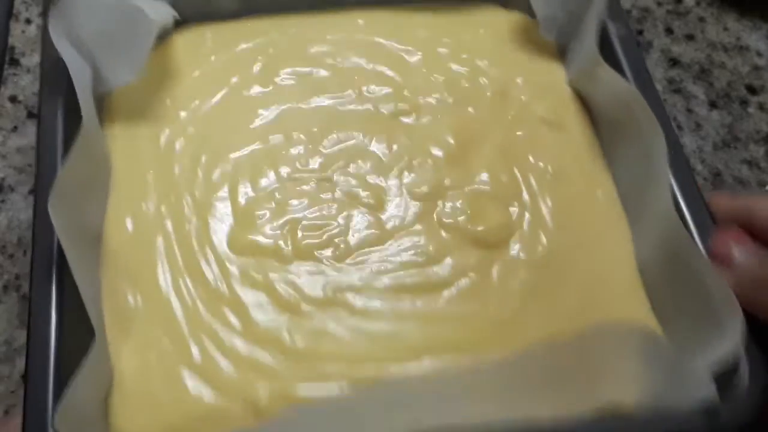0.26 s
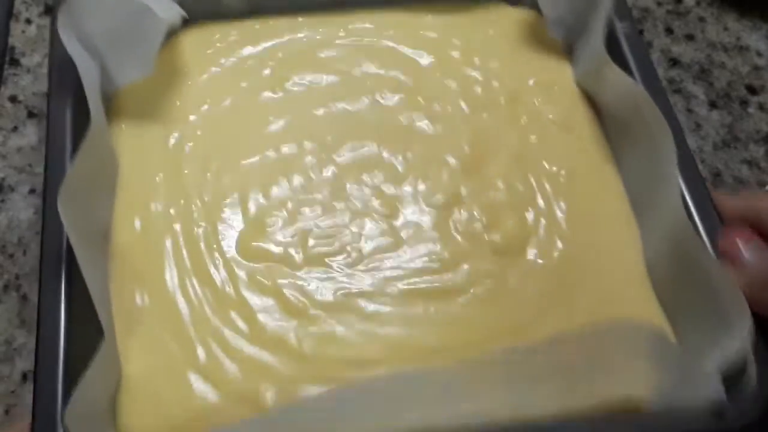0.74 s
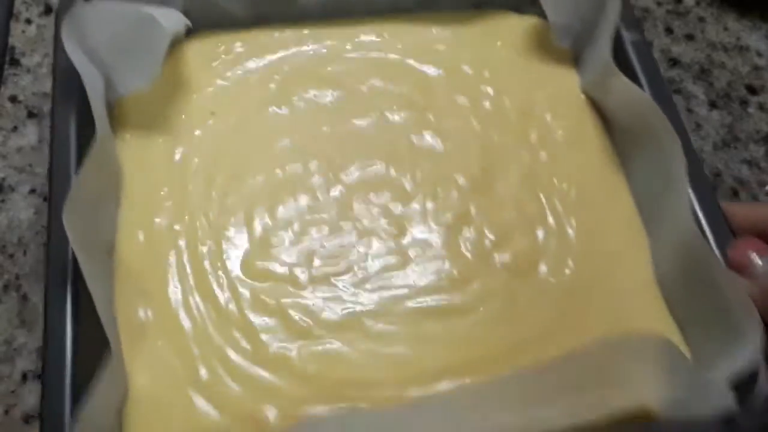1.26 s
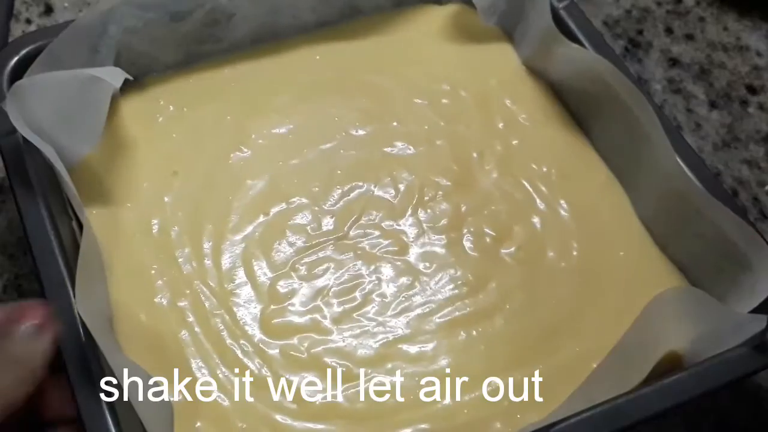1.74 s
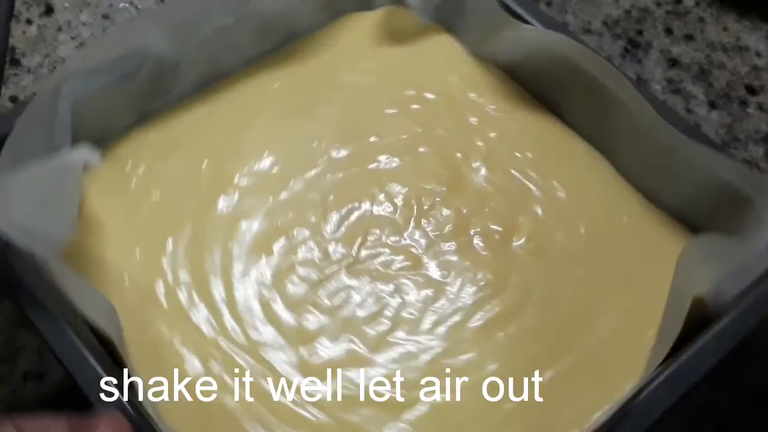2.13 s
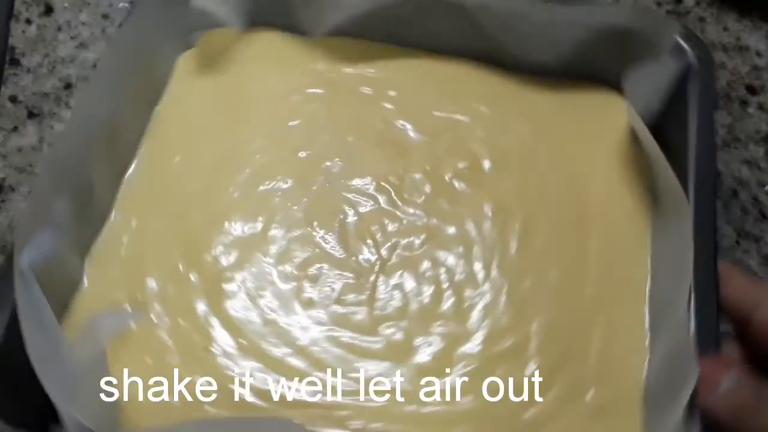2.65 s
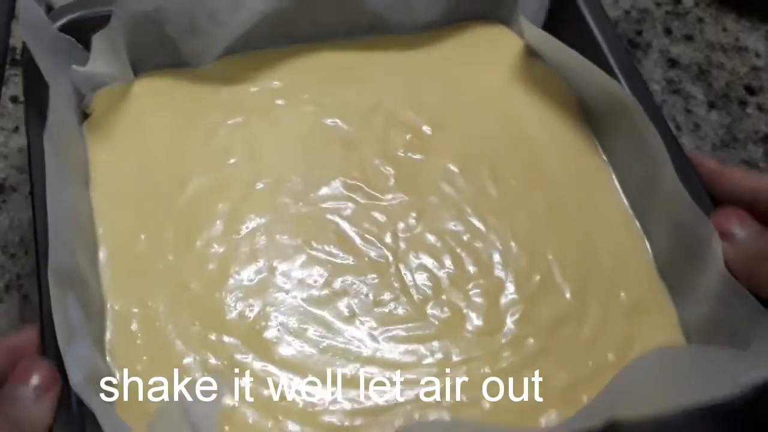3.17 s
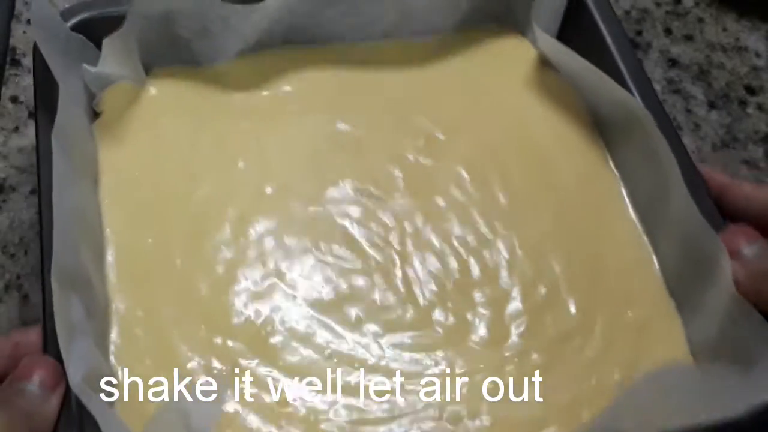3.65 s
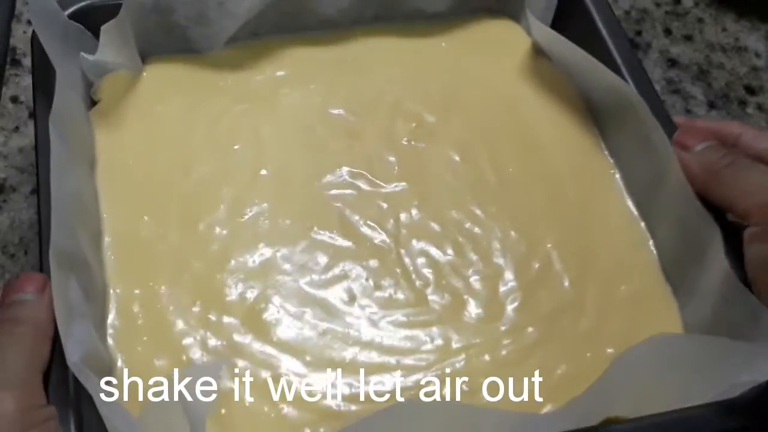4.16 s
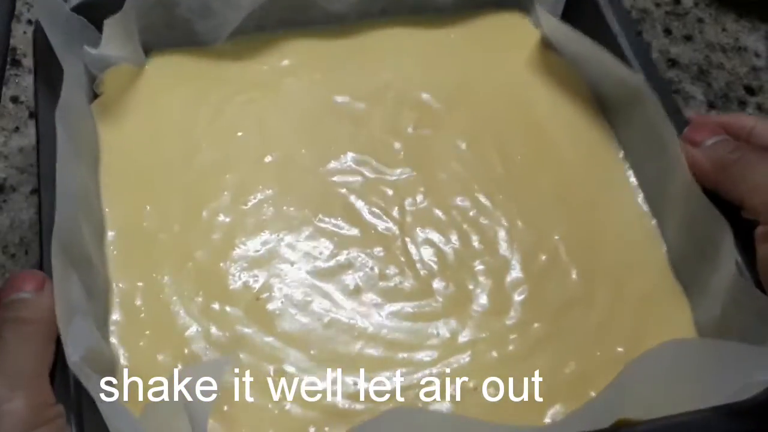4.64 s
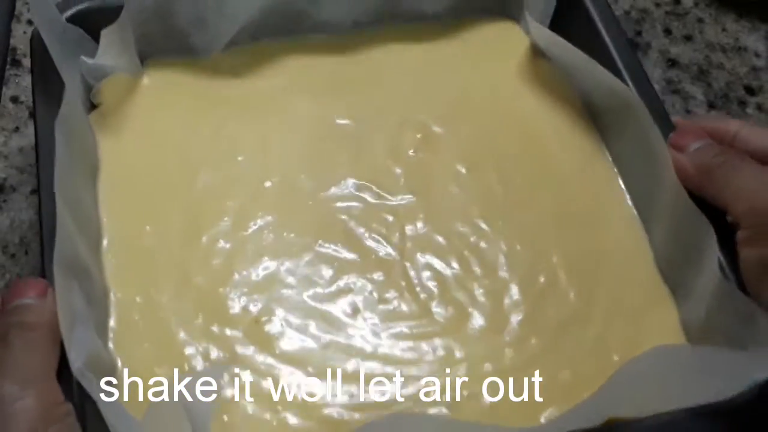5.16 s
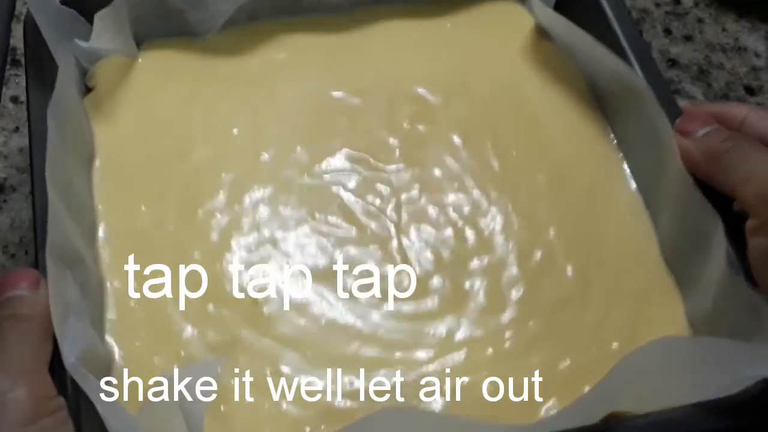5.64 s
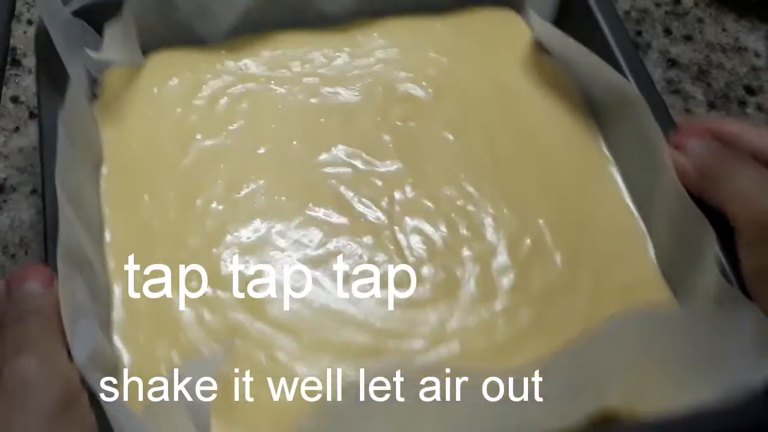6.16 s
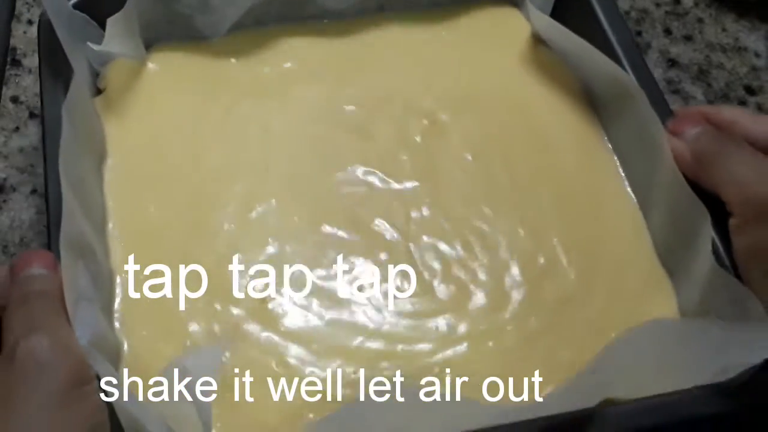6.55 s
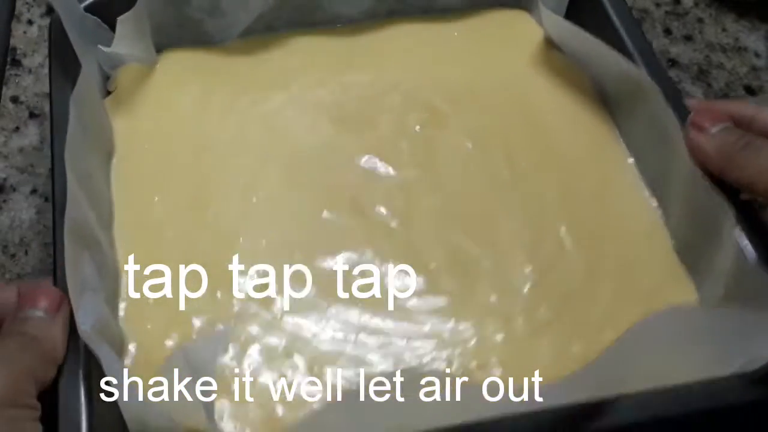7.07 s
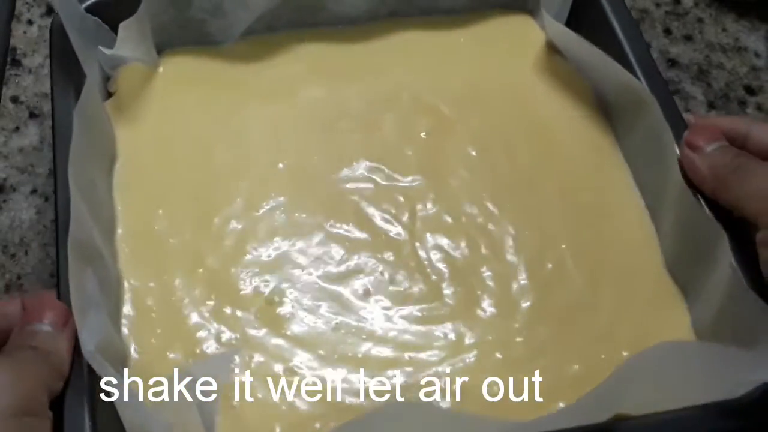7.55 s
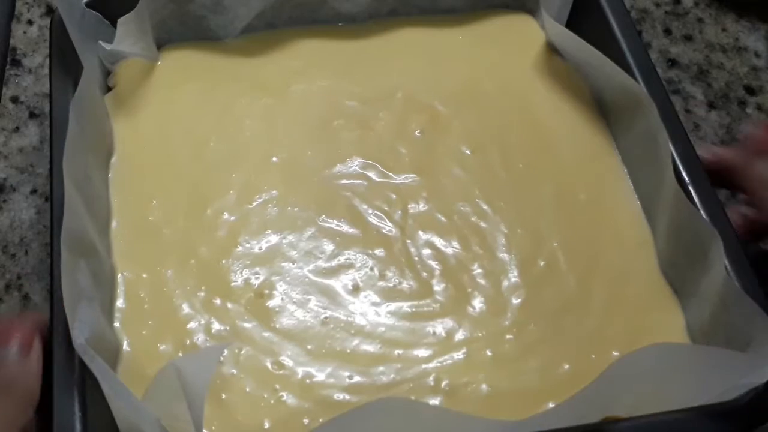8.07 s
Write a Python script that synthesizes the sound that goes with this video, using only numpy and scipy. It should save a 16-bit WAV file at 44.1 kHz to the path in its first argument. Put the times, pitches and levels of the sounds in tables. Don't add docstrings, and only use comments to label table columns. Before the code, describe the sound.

A quiet kitchen with a soft fridge hum. Hands shuffle a paper-lined tin full of batter: dry crackles, snaps and faint low bumps. A light metallic touch on the counter, more crinkling as it is turned, then five loud, dull metal bangs about a third of a second apart. After brief rustling come three more raps. A close small microphone catches short room echoes.

```python
import sys
import numpy as np
from scipy import signal
from scipy.fft import rfft, irfft
from scipy.io import wavfile
from scipy.ndimage import uniform_filter1d

SR = 44100
rng = np.random.default_rng(int(sys.argv[2]) if len(sys.argv) > 2 else 0)


def unload_wav(signal):
    wavfile.write(
        sys.argv[1],
        SR,
        np.round(np.clip(np.atleast_2d(signal).T, -1, 1) * 32767).astype(np.int16),
    )


def volts_from_db(level):
    exponent = np.asarray(level, float) / 20
    return 10 ** exponent


N = 366471

# frequency in Hz, level in dB per Hz.
PAPER_SPECTRUM = [(470, -31), (800, 4.5), (1250, -4), (2100, -3.5), (3100, -5), (4300, -6.5), (6500, -4),
                  (8020, -14.5), (9000, -5), (10500, -6.5), (12500, -12), (15300, -14), (16500, -34)]


def evened(x):
    return x / np.sqrt(np.mean(x ** 2) + 1e-20)


def read(points, hz):
    f, value = np.transpose(points)
    return np.interp(np.log(hz + 1), np.log(f + 1), value)


def coloured(x, spectrum):
    gain = volts_from_db(read(spectrum, np.fft.rfftfreq(x.shape[-1], 1 / SR)))
    return irfft(rfft(x) * gain, x.shape[-1])


def band(x, lo_hz, hi_hz):
    return signal.sosfilt(signal.butter(2, [lo_hz, hi_hz], "bandpass", fs=SR, output="sos"), x)


def add(mix, s, sound):
    part = mix[round(s * SR):][:len(sound)]
    part += sound[:len(part)]


def echoes(count):
    # frequency in Hz, t60 in s.
    kitchen = [(150, 0.4), (400, 0.35), (1040, 0.39), (2760, 0.36), (7280, 0.33)]
    # frequency in Hz, level in dB.
    wet = [(100, 10.5), (300, -4), (800, -2.5), (2000, -5.5), (5000, -5), (12000, -6)]
    length = SR // 2
    hz, t, z = signal.stft(rng.standard_normal((count, length)), SR, nperseg=256)
    decay = volts_from_db(-60 * t / read(kitchen, hz)[:, None])
    tail = signal.istft(z * decay, SR, nperseg=256)[1][:, :length]
    tail = tail * np.clip((np.arange(length) / SR - .001) / 0.0013, 0, 1)
    return coloured(tail / np.linalg.norm(tail, axis=1)[:, None], wet)


def ring(modes, t, chance, rise_s, lean_db=0):
    hz, db, t60 = np.array(modes).T[:, :, None]
    weight, turn, detune = chance[:len(modes)].T[:, :, None]
    phase = .5 * turn + np.pi * np.arange(len(modes))[:, None]
    decay = volts_from_db(db + lean_db + 1.2 * weight - 60 * t / t60)
    waves = decay * np.sin(2 * np.pi * hz * (1 + 0.011 * detune) * t + phase)
    waves *= 1 + .6 * np.sin(2 * np.pi * (22 + 6 * turn) * t + 3 * detune)
    sound = waves.sum(0) * (1 - np.exp(-t / rise_s))
    return sound / abs(sound).max()


def room_air():
    # frequency in Hz, level in dB per Hz.
    air_spectrum = [(12, -18.5), (20, -18.5), (44, -19.5), (91, -5), (147, -10.5), (314, -2), (372, -9.5),
                    (479, -4), (583, -9), (1320, -19), (1790, -17.5), (7950, -38), (9950, -31.5),
                    (15200, -44), (16500, -54)]
    return volts_from_db(-55) * evened(coloured(rng.standard_normal(N), air_spectrum))


def fridge():
    # frequency in Hz, width in Hz, level in dB rms.
    hum = [(100, 12, -67), (185.5, 34, -63.5), (227.5, 8.6, -67), (300, 6.4, -67.5), (312.6, 13.7, -60),
           (440, 12, -79), (475, 12.2, -64.5), (514, 6.9, -82), (962, 8.5, -74), (2090, 280, -73.5)]
    t, out = np.arange(N) / SR, np.zeros(N)
    for (hz, width, db), (a, b) in zip(hum, rng.standard_normal((len(hum), 2, N))):
        r = np.exp(-np.pi * width / SR)
        wander = signal.lfilter([1], np.convolve([1, -r], [1, -r]), a + 1j * b)
        out += volts_from_db(db) * evened((wander * np.exp(2j * np.pi * hz * t)).real)
    steady = np.sin(2 * np.pi * 100 * t) + .5 * np.sin(2 * np.pi * 476 * t)
    return out + volts_from_db(-58.5) * np.sqrt(2) * steady


def rubbing():
    # start in s, hold in s, crackle level in dB, scrape level in dB.
    strokes = [(.001, 0.035, -64.5, -56.5), (.105, .02, -61, -55), (0.178, 0.0096, -55, -63),
               (0.193, 0.15, -58.5, -55), (0.436, 0.038, -61.5, -53), (0.58, 0.2, -61, -53.5),
               (0.836, 0.2, -60.5, -54.5), (1.07, 0.21, -62, -55), (1.468, 0.053, -65, -62),
               (2.412, 0.018, -62.5, -52.5), (2.755, 0.013, -63.5, -56), (3.086, 0.07, -69, -60),
               (3.27, .03, -68, -70), (3.369, .23, -59.5, -54), (3.671, 0.031, -56.5, -51.5),
               (3.844, 0.024, -63, -54), (6.096, 0.11, -63, -55), (6.288, .05, -57, -57),
               (6.425, 0.011, -57.5, -62), (6.508, 0.14, -65.5, -58), (2.2, 2, -75, -76),
               (6.75, 0.74, -79, -72)]
    rise_db_per_s, fall_db_per_s = 452, 165
    time, levels = np.arange(N) / SR, np.zeros((2, N))
    for s, hold, *db in strokes:
        rise_db = np.minimum(rise_db_per_s * (time - s), 0)
        fall_db = fall_db_per_s * np.maximum(time - s - hold, 0)
        levels = np.maximum(levels, volts_from_db(np.c_[db]) * volts_from_db(rise_db - fall_db))
    clumps = volts_from_db(1.6 * evened(uniform_filter1d(rng.standard_normal(N), size=500)))
    happens = rng.random((2, N)) < 1600 * clumps / SR
    sizes = volts_from_db(2.0 * np.minimum(rng.exponential(1, (2, N)), 5)) * happens
    decay = np.exp(-np.arange(2000) / SR / .0015)
    grains = signal.oaconvolve(sizes, decay[None])[:, :N] * rng.standard_normal((2, N))
    crackle = levels[0] * evened(band(coloured(grains[0], PAPER_SPECTRUM), 3300, 17000))
    scrape = levels[1] * evened(band(coloured(grains[1], PAPER_SPECTRUM), 1160, 2740))
    return volts_from_db(-0.5) * crackle + volts_from_db(-7.0) * scrape


def snaps():
    # time in s, peak in dB, brightness in dB.
    shuffle_snaps = [(0.173, -23, -6.5), (0.2523, -22.5, 1), (0.394, -36, -9), (0.4374, -42, -14),
                     (0.498, -41, -17), (0.5492, -38, -3.5), (0.647, -34.5, -7), (0.691, -33, -6),
                     (0.752, -32, -3), (0.8375, -36, -10), (0.8999, -32, -6), (0.943, -33, -15),
                     (1.008, -34.5, 0), (1.058, -34.5, -4), (1.0934, -25.5, -6.5), (1.153, -32, -20.5),
                     (1.1932, -37, -11), (1.261, -31.5, -1), (1.3124, -38, -14), (2.2402, -38.5, -18),
                     (2.315, -44, -18), (2.4063, -28, -10.5), (2.7545, -34, -8), (3.0892, -35.5, -11)]
    # time in s, peak in dB, brightness in dB.
    turn_snaps = [(3.403, -26, -17), (3.453, -30, -7), (3.584, -25, -1), (3.625, -25, -18),
                  (3.722, -29, -14), (3.757, -26.5, -5.5), (3.831, -30, -2.5), (3.840, -28, -26),
                  (4.025, -40.5, -15), (4.841, -32, -17), (5.167, -40, -2), (5.187, -30, -9)]
    # time in s, peak in dB, brightness in dB.
    grip_snaps = [(6.0997, -45, -8), (6.3117, -31, 3), (6.3292, -35, 5.5), (6.3591, -31.5, -32),
                  (6.423, -31, -18), (6.5821, -47, -12), (6.6031, -33, -8.5), (6.6594, -40.5, -1),
                  (7.0271, -43, -14)]
    t, dull, bright = np.arange(2000) / SR, np.zeros(N), np.zeros(N)
    for rows, fall_s in ((shuffle_snaps, 0.0093), (turn_snaps, 0.0044), (grip_snaps, 0.008)):
        for s, db, bright_db in rows:
            burst = rng.standard_normal(len(t)) * volts_from_db(db - 15.0 - 20 * t / fall_s)
            add(dull, s, burst)
            add(bright, s, burst * volts_from_db(bright_db + 13.0))
    both = volts_from_db(10.5) * band(dull, 1400, 5550) + band(bright, 5360, 10200)
    return volts_from_db(2) * coloured(both, [(hz, .5 * db) for hz, db in PAPER_SPECTRUM])


def paper():
    direct = rubbing() + snaps()
    return direct + volts_from_db(-3) * signal.fftconvolve(direct, echoes(1)[0])[:N]


def bumps():
    # time in s, peak in dB, frequency in Hz, t60 in s.
    pushes = [(0.071, -34, 95, 0.062), (0.089, -35, 95, 0.054), (0.104, -28.5, 128, 0.03),
              (.33, -37, 100, 0.041), (2.14, -28, 100, 0.04), (2.254, -33.5, 106, 0.035),
              (2.285, -42, 100, 0.045), (4.461, -40, 70, .05), (2.39, -53, 45, .08),
              (6.562, -42.5, 69.5, .06), (6.664, -38.5, 60, 0.055), (6.75, -51, 44.2, 0.073),
              (6.93, -43, 60, 0.051)]
    t, out = np.arange(5000) / SR, np.zeros(N)
    for s, db, hz, t60 in pushes:
        push = np.sin(2 * np.pi * hz * t) * volts_from_db(-60 * t / t60) * (1 - np.exp(-t / 0.0015))
        add(out, s, -volts_from_db(db) * push / abs(push).max())
    return band(out, 50, 600)


def tin():
    # time in s, base boom in dB, base mode nearest the blow in Hz,
    # walls in dB, rim in dB.
    contacts = [(1.846, -37.5, 544, -41.5, -35), (1.861, -34, 595, -49, -35.5),
                (4.4872, -5.5, 540, -10.5, -17.5), (4.4956, -4.5, 348, -7, -13.5),
                (4.501, -12.5, 400, -14, -15), (4.849, -14, 625, -17.5, -35), (4.8679, -17, 610, -28, -21),
                (4.871, -13, 520, -53.5, -44), (4.8766, -9, 520, -14, -17.5), (5.1964, -12, 627, -19, -33),
                (5.206, -6.5, 462, -14, -5.5), (5.219, -16.5, 570, -11.5, -13), (5.536, -8, 490, -10, -15),
                (5.538, -6.5, 264, -14.5, -30), (5.548, -13.5, 250, -19.5, -29),
                (5.796, -45.5, 600, -21.5, -34), (5.8027, -3, 610, -11.5, -4),
                (5.812, -25, 620, -7.5, -10.5), (7.295, -20.5, 484, -44, -35.5),
                (7.3035, -2, 337, -9, -13.5), (7.604, -29, 484, -49, -73), (7.6151, -5, 359, -16, -15.5),
                (7.8466, -7.5, 370, -19, -18), (7.8535, -9, 480, -22.5, -28.5)]
    # frequency in Hz, level in dB, t60 in s.
    base_modes = [(196.7, -4, 0.089), (242.3, -10.5, 0.16), (337, 2, 0.04), (400, 1, 0.02), (484, 6, 0.027),
                  (474, -15, 0.23), (625, -8, 0.084)]
    # frequency in Hz, level in dB, t60 in s.
    wall_modes = [(692, 1, 0.066), (843, 2, 0.1), (933, 1.5, 0.066), (1109, 3, 0.031), (1188, 6, 0.022),
                  (1315, 6, 0.07), (1520, 6, 0.02)]
    # frequency in Hz, level in dB, t60 in s.
    rim_modes = [(1700, 9, 0.012), (1800, -3.5, 0.05), (2005, 5.5, 0.02), (2353, 5, 0.036),
                 (2370, -8.5, 0.024), (2674, -4, 0.024), (2950, -18.5, 0.029), (3790, -18.5, 0.0093)]
    # frequency in Hz, level in dB per Hz.
    crack_spectrum = [(1470, -29), (2500, -7), (3980, -12.5), (4560, -14.5), (5170, -12), (7030, -19),
                      (9720, -14), (15100, -27), (16000, -40), (16500, -56)]
    count, length = len(contacts), 9000
    t, out = np.arange(length) / SR, np.zeros(N)
    base_hz, rim_hz = np.array(base_modes)[:, :1], np.array(rim_modes)[:, :1]
    chance = rng.standard_normal((count, 3, 8, 3))
    grit = coloured(rng.standard_normal((count, length)), crack_spectrum)
    impulse = np.arange(length) == 300
    click = evened(coloured(impulse, crack_spectrum))
    thud = np.sin(2 * np.pi * 60 * t) * volts_from_db(-60 * t / .15) * (1 - np.exp(-t / 0.0046))
    thud = band(thud, 45, 300)
    for (s, base_db, near_hz, walls_db, rim_db), c, noise, tail in zip(contacts, chance, grit, echoes(count)):
        lean_db = np.maximum(-18 * abs(np.log2(base_hz / near_hz)), -13)
        base = volts_from_db(base_db) * band(ring(base_modes, t, c[0], 0.00033, lean_db), 226, 3000)
        tilt_db = 12 * np.log2(480 / near_hz) * np.log2(rim_hz / 2000)
        walls = volts_from_db(walls_db + 4) * ring(wall_modes, t, c[1], 0.00032)
        rim = volts_from_db(rim_db + 2.5) * ring(rim_modes, t, c[2], 0.00028, tilt_db)
        sheet = walls + rim
        crack_db = -10 + 0.59 * rim_db + 0.16 * base_db + 0.13 * walls_db
        crack = volts_from_db(crack_db + 3.5 - 60 * t / 0.035) * evened(noise) * (1 - np.exp(-t / 0.00082))
        add(out, s, base + sheet + crack + volts_from_db(base_db - 37) * thud)
        slap = coloured(impulse, [(120, base_db - 1.5), (near_hz, base_db + 26.5), (1000, walls_db + 33),
                                  (2000, rim_db + 33.0), (2700, rim_db + 15), (3600, rim_db - 3),
                                  (5000, rim_db - 13.5)])
        add(out, s - .005, volts_from_db(-24.0) * slap)
        to_room = volts_from_db(-6) * base + volts_from_db(-8.5) * sheet + slap + volts_from_db(crack_db - 17.5) * click
        add(out, s, signal.fftconvolve(to_room, tail))
    return out


def pings():
    # time in s, peak in dB, frequency in Hz, t60 in s.
    rings = [(1.85, -42, 2090, .05), (2.408, -48, 2100, .04), (2.758, -52, 2030, .25),
             (4.497, -12, 330, 0.059), (4.878, -26.5, 490, 0.36), (4.879, -23, 1300, .2),
             (5.205, -15.5, 3200, 0.011), (5.22, -22.5, 1280, 0.4), (5.54, -26.5, 490, 0.38),
             (5.551, -24, 1300, .2), (7.31, -18.5, 345, 0.17), (7.619, -46.5, 4760, 0.37),
             (7.848, -37.5, 4850, 0.32), (7.855, -19.5, 800, 0.052)]
    t, out = np.arange(12000) / SR, np.zeros(N)
    for s, db, hz, t60 in rings:
        pair = [(hz, 0, t60), (hz * .978, -4, t60)]
        add(out, s, volts_from_db(db) * ring(pair, t, np.zeros((2, 3)), 0.00063))
    return out


def pops():
    # time in s, peak in dB, t60 in s.
    recoils = [
        (7.148, -31, 0.034),
        (7.549, -28, 0.064),
    ]
    t, out = np.arange(9000) / SR, np.zeros(N)
    for (s, db, t60), tail in zip(recoils, echoes(len(recoils))):
        modes = [(484, 6, t60), (730, -5.0, 0.02)]
        pop = volts_from_db(db) * ring(modes, t, np.zeros((2, 3)), 0.00058)
        add(out, s, pop)
        add(out, s, volts_from_db(-5.5) * signal.fftconvolve(pop, tail))
    return out


def scene():
    return (room_air() + fridge() + paper() + bumps() + tin() + pings() + pops())[None]


def roll_off(x):
    return signal.sosfilt(signal.butter(12, 16800, fs=SR, output="sos"), x)


def record(dry):
    limited = 1.074 * np.tanh(dry / 1.152)
    limited = signal.sosfilt(signal.butter(2, 38, "highpass", fs=SR, output="sos"), limited)
    lowpass = signal.firwin(255, 16500, window=("kaiser", 9), fs=SR)
    return roll_off(signal.oaconvolve(limited, lowpass[None], "same"))


dry = scene()
out = record(dry)
unload_wav(out)
```